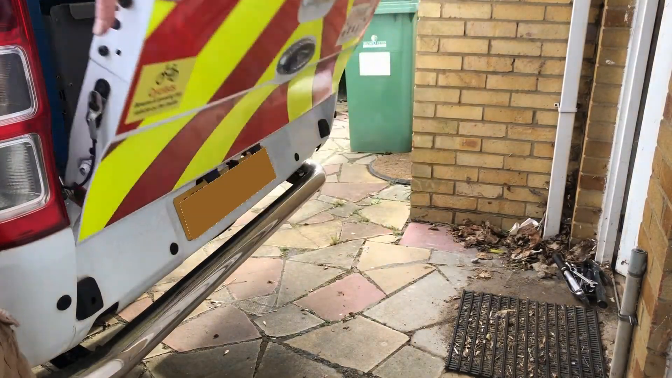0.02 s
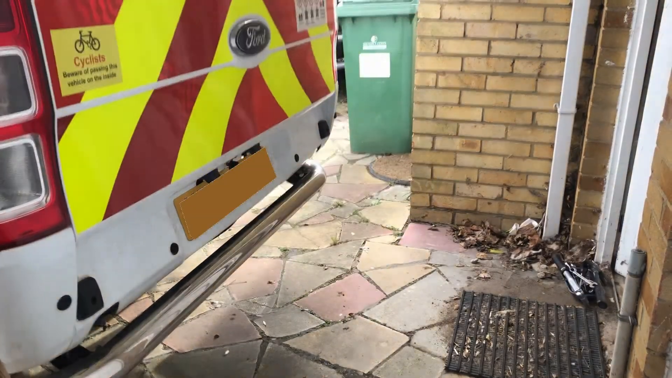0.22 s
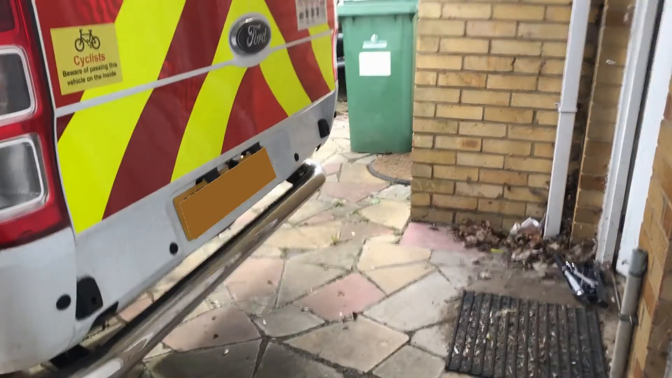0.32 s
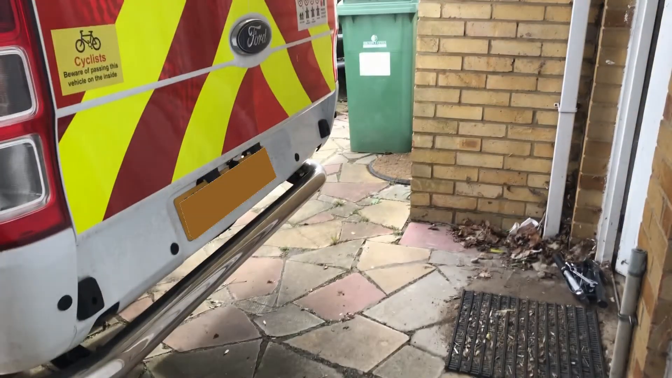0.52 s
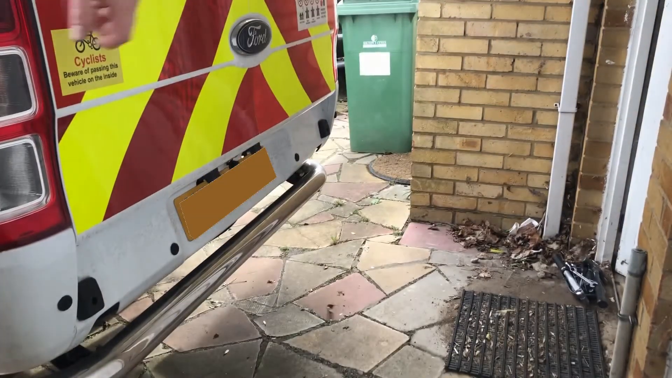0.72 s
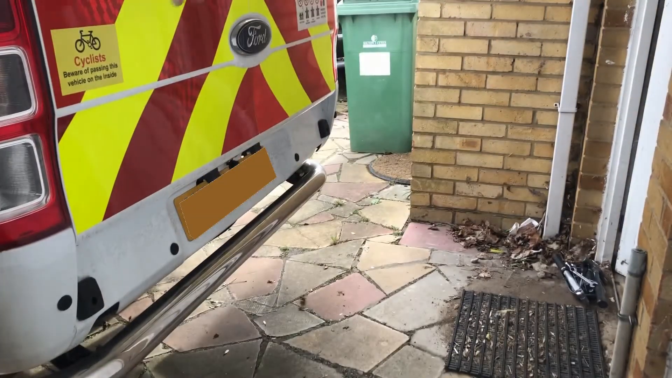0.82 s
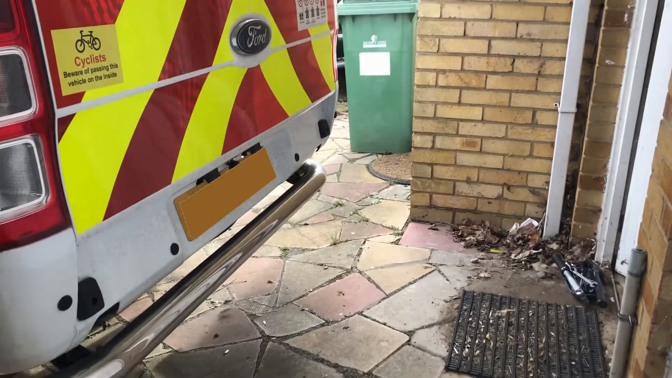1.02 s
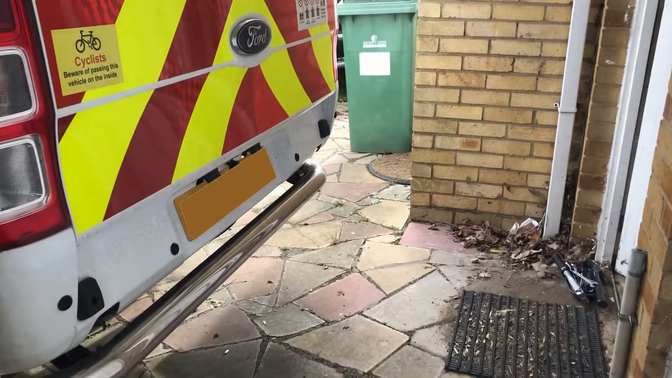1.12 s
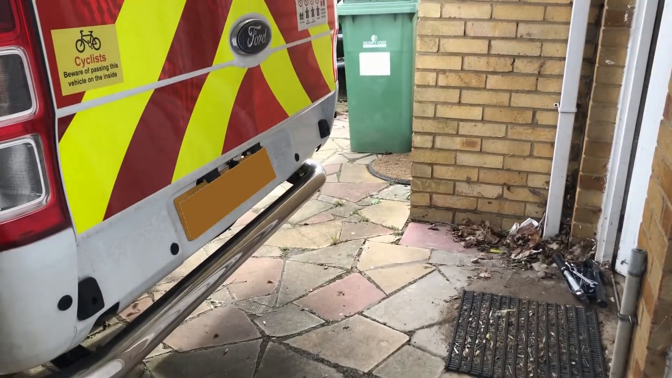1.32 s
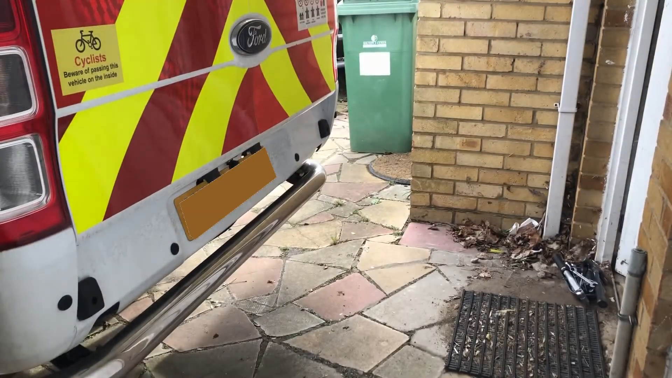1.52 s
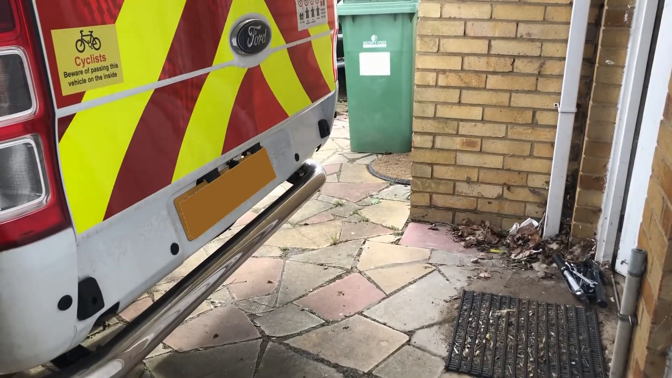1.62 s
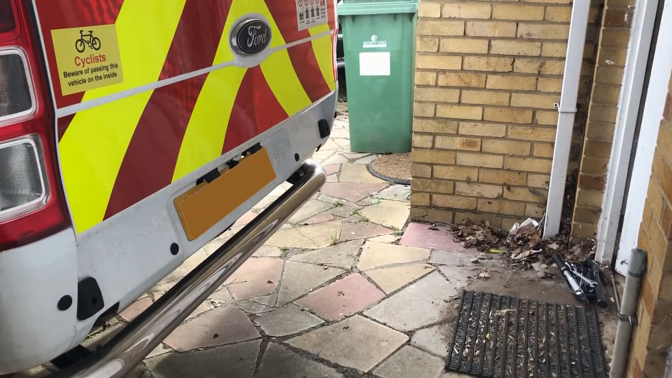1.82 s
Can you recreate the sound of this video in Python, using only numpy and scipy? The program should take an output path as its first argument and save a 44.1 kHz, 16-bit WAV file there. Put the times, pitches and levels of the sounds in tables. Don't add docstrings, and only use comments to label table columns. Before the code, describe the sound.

Van door slam: sharp metallic latch snap, deep hollow body thump, brief rattle, then faint scuffs

```python
import sys
import numpy as np
from scipy import signal
from scipy.io import wavfile

SR = 44100
rng = np.random.default_rng(int(sys.argv[2]) if len(sys.argv) > 2 else 0)


def master(y):
    cut = np.clip(np.atleast_2d(y).T, -1, 1)
    pcm = np.round(cut * 32767)
    wavfile.write(sys.argv[1], SR, pcm.astype(np.int16))


def invert_db(x):
    u = np.asarray(x, float) / 20
    return 10 ** u


N = 83790
T = np.arange(N) / SR


def rms_one(x):
    return x / np.sqrt(np.mean(x ** 2) + 1e-20)


def at_hz(points, hz):
    curve_hz, curve_db = np.array(points).T
    return np.interp(np.log(hz), np.log(curve_hz), curve_db)


def drift(rate):
    r = np.exp(-80 * np.pi * rate / SR)
    noise = rng.standard_normal(N // 40 + 2002)
    slow = signal.lfilter([1], [1, -2 * r, r * r], noise)[2000:]
    return np.interp(np.arange(N) / 40, np.arange(len(slow)), rms_one(slow))


def ring(clicks, hz, t60):
    r = invert_db(-60 / (t60 * SR))
    w = 2 * np.pi * hz / SR
    return signal.lfilter([0, np.sin(w)], [1, -2 * r * np.cos(w), r * r], clicks + 1e-18)


def swell(s, rise, t60):
    t = np.clip(T - s, 0, None)
    onset = np.sin(np.pi / 2 * np.minimum(t / max(rise, 1e-4), 1)) ** 2
    return onset * invert_db(-60 * np.maximum(t - rise, 0) / t60)


def bands(sources):
    edges = 20 * 2 ** np.arange(0, 10.1, .5)
    longer = np.concatenate([sources[:, -8000:], sources], axis=1)
    out = []
    for k, (low, high) in enumerate(zip(edges, edges[1:])):
        band = signal.butter(2, [low, high], "band", fs=SR, output="sos")
        out.append((np.sqrt(low * high), signal.sosfilt(band, longer[k % 2])[-N:]))
    return out


def grainy_bursts(rows, colour, rate, spread, lows_last):
    sizes = invert_db(spread * np.minimum(rng.exponential(1, (2, N)), 3)) * rng.choice([-1, 1], (2, N))
    grains = rms_one(sizes * (rng.random((2, N)) < rate / SR))
    out = 0
    for hz, x in bands(grains)[6:]:
        shape = 0
        for s, rise, db, t60, tilt in rows:
            level = invert_db(db + tilt * np.log2(hz / 4000))
            shape = shape + level * swell(s, rise, t60 * (4000 / hz) ** lows_last)
        out = out + invert_db(at_hz(colour, hz) + 9) * shape * x
    return out


def struck(hits, modes):
    chance = rng.normal(0, 2, (len(hits), len(modes)))
    out = []
    for k, (hz, level_db, t60) in enumerate(modes):
        pushes = np.zeros(N)
        for (s, db, contact_hz), odd in zip(hits, chance[:, k]):
            pushes[int(s * SR)] = -invert_db(db + level_db + odd) / (1 + (hz / contact_hz) ** 2)
        out.append(signal.lfilter([.2], [1, -.8], ring(pushes, hz, t60)))
    return out


def slipping(strokes, modes):
    slips_per_s = 6100
    stroke = sum(invert_db(db) * swell(s, rise, t60) for s, rise, db, t60 in strokes)
    sound = 0
    for hz, db, t60 in modes:
        sizes = invert_db(3 * np.minimum(rng.exponential(1, N), 3)) * rng.choice([-1, 1], N)
        slips = sizes * (rng.random(N) < slips_per_s / SR)
        sound = sound + invert_db(db) * rms_one(ring(slips, hz, t60))
    return stroke * rms_one(sound)


def panel():
    # t/s, level/dB, contact f/Hz
    thuds = [(.224, -60, 502), (.258, -30, 1163), (.275, -15, 800), (.2855, -0.5, 620), (.291, -15.5, 600),
             (.297, -4.5, 400), (.304, 4, 156), (.311, 3, 158.4), (.327, -14.5, 284), (.339, -4, 406),
             (.345, -4.5, 494), (.351, -11, 510), (.362, -9, 297), (.368, -2, 328), (0.398, -11, 390),
             (0.437, -37, 298)]
    # f/Hz, level/dB, t60/s
    panel_modes = [(102, -7.5, 0.12), (144.5, -3, 0.1), (177.4, 2.5, 0.095), (230, -12.5, 0.081),
                   (310, -25, 0.07), (344, -29, 0.03), (418.5, 2, 0.088), (569, 4, 0.12), (708, -16, 0.12),
                   (838, -9, 0.039), (940, -15.5, 0.054), (1291, -1.5, 0.1)]
    # f/Hz, level/dB, t60/s
    cabin_modes = [(48.1, -20.5, 0.85), (78, -21.5, 1), (107.6, -25, 0.75), (164.9, -17.5, 0.65),
                   (194.6, -19, 0.68), (247, -15, 1.0), (298, -14.5, 0.19), (348, -24, 0.68),
                   (418.2, -5, 0.28), (568, -28, 0.29)]
    seated_s, seated_db = .376, -5.5
    waver_db, waver_per_s = 4, 16
    grip = invert_db(-8.5 + seated_db * np.clip((T - seated_s) / 0.0026, 0, 1))
    cabin = 0
    for (hz, *_), x in zip(cabin_modes, struck(thuds, cabin_modes)):
        waver = waver_db * min(1, 90 / hz) * drift(waver_per_s)
        cabin = cabin + invert_db(-7.5 + waver) * x
    return grip * sum(struck(thuds, panel_modes)) + cabin


def boom():
    # t/s, level/dB
    squeezes = [
        (0.284, -6),
        (0.3044, -8.5),
        (0.325, -20),
        (.352, -15.5),
    ]
    air_hz, air_t60_s = 43.6, 0.17
    pushes = np.zeros(N)
    for s, db in squeezes:
        pushes[int(s * SR)] = -invert_db(db)
    lows = signal.butter(2, 90, fs=SR, output="sos")
    return signal.sosfilt(lows, ring(pushes, air_hz, air_t60_s))


def latch():
    # t/s, peak level/dB, colour [dB per octave], bolt share [0-1]
    snaps = [
        (.012, -52, -5, 0),
        (.1955, -8, -0.5, 0),
        (0.199, -13.5, -1.0, 0),
        (0.2393, 3, -0.5, 1),
        (0.2522, -1.5, 6, .8),
        (0.262, -13, 4, .7),
        (0.803, -40, 0, 0.4),
        (1.485, -60, 3, .6),
    ]
    # f/Hz, level from the pawl/dB, level from the bolt/dB, t60/s
    steel = [(2840, -4.5, -7.5, 0.0039), (3160, -9, -1.5, 0.01), (3670, -5.5, -13, 0.013),
             (4550, -3.5, -13, .008), (5620, -6.5, -9.5, 0.013), (6060, 2.5, -10, 0.012),
             (6340, -9.5, -5, .012), (9860, 3.5, -12, .008), (12000, -9, -7, .005),
             (13400, -15, 3.5, 0.0071), (14800, -8, -4, .005)]
    crunch_s, crunch_share = 0.00046, .4
    s, db, tilt, bolt = np.transpose(snaps)
    chance = rng.normal(0, 2, (len(s), len(steel)))
    r = np.exp(-1 / (crunch_s * SR))
    out = 0
    for k, (hz, pawl_db, bolt_db, t60) in enumerate(steel):
        clicks = np.zeros(N)
        level_db = pawl_db + np.clip(bolt, 0, 1) * (bolt_db - pawl_db)
        clicks[(s * SR).astype(int)] = invert_db(db + level_db - 12.5 + tilt * np.log2(hz / 6000) + chance[:, k])
        crunch = signal.lfilter([np.sqrt(1 - r * r)], [1, -r], clicks) * rng.standard_normal(N)
        out = out + ring(clicks * (-1) ** k + crunch_share * crunch, hz, t60)
    return out


def claw():
    # t/s, rise/s, level/dB, t60/s
    strokes = [
        (0.01, 0.0025, -46, 0.57),
        (0.054, 0.029, -37, 0.43),
        (.197, 0.0013, -25.5, 0.04),
        (.206, 0.0034, -30.5, 0.088),
        (1.21, 0.0094, -52.5, 0.23),
        (1.414, 0.01, -54.5, 0.2),
        (1.49, 0.022, -63, 0.25),
        (1.659, 0.025, -56, 0.14),
    ]
    # f/Hz, level/dB, t60/s
    claw_modes = [(2193, -3.5, 0.013), (3500, -3, 0.0031), (4000, -4, 0.0045), (4670, 1, 0.0097),
                  (5460, -1.5, 0.024), (6260, 1.5, 0.0082), (6530, -5, 0.0071), (9100, -9, 0.0048)]
    return slipping(strokes, claw_modes)


def rattles():
    # t/s, rise/s, level/dB, t60/s, colour [dB per octave]
    bursts = [
        (.12, 0.0046, -38, 2, -3.5),
        (.197, 0.00094, -27.5, 0.46, -2.5),
        (.2, 0.027, -41, 0.11, -3.5),
        (.239, 0.002, -10, 0.19, 2.5),
        (.25, 0.011, -9, 0.26, 3),
        (.272, 0.011, -10.5, 0.21, -4.5),
        (.325, 0.017, -21, 0.24, -2),
        (.41, 0.022, -36.5, 0.21, 1.5),
        (.45, 0.15, -70, 1.31, -3.5),
        (.9, 0.0034, -43, 0.15, -1),
    ]
    # f/Hz, level/dB
    colour = [(120, -13), (200, -12.5), (304, -8.5), (1200, -11.5), (3000, -14), (4300, -17.5), (6100, -16),
              (15500, -21.5)]
    return grainy_bursts(bursts, colour, rate=12000, spread=4, lows_last=0.2)


def spring():
    # f/Hz, level/dB
    coils = [(9400, -60), (12390, -56), (14500, -66)]
    shiver = sum(invert_db(db) * rms_one(ring(rng.standard_normal(N), hz, 0.05)) for hz, db in coils)
    return swell(.412, .016, .28) * shiver


def chatter():
    # t/s, rise/s, level/dB, t60/s
    strokes = [
        (.2395, 0.015, -19, 0.17),
        (.335, 0.0079, -26.5, 0.14),
        (1.48, 0.006, -58, 0.064),
    ]
    # f/Hz, level/dB, t60/s
    frame_modes = [(800, -4.5, 0.14), (1302, 2.5, 0.016), (1827, -13, 0.019), (2407, -3.5, 0.039),
                   (3130, -7, 0.015)]
    return slipping(strokes, frame_modes)


def taps():
    # t/s, level/dB
    touches = [(.2405, -25.5), (.2465, -21), (.2555, -21), (.2605, -14), (.2725, -14.5), (.2835, -15),
               (.9125, -40), (.9195, -41), (.9245, -44), (1.428, -60), (1.486, -62), (1.674, -60)]
    # f/Hz, level/dB, t60/s
    edge_modes = [(614, -7, 0.068), (826, -2.5, 0.044), (879, -2.5, 0.064), (1290, 0.5, 0.036),
                  (2430, -2.5, 0.033), (3150, -11, .02)]
    return sum(struck([(s, db, 2500) for s, db in touches], edge_modes))


def knock():
    # t/s, level/dB
    touches = [
        (0.198, -35),
        (0.214, -36),
        (0.9022, -33),
        (0.9054, -39.5),
        (0.9078, -35),
        (.915, -49),
        (0.2283, -26),
    ]
    # f/Hz, level/dB, t60/s
    shell_modes = [(357, -17.5, 0.067), (439, 0, 0.036), (514, -9.5, 0.037), (885, -8, 0.05),
                   (1053, -6, .05), (1386, -8, 0.1), (2400, -11, 0.025)]
    return sum(struck([(s, db, 900) for s, db in touches], shell_modes))


def settling():
    # t/s, level/dB, f/Hz, t60/s
    parts = [(.013, -44, 2300, .03), (.083, -42, 2250, .03), (.2405, -17, 1290, .08), (.47, -30, 172, .2),
             (.615, -42, 247, .5), (.738, -38, 105, .15), (.79, -41, 41, .4), (.804, -54, 5200, .04),
             (.9015, -42, 870, .06), (.9188, -41, 2380, .025), (.921, -43, 1330, .04),
             (.921, -38, 110, .08), (1.29, -43, 173, .3), (1.418, -50, 6900, .02), (1.426, -53, 2300, .04),
             (1.43, -52, 5500, .04), (1.483, -50, 3270, .04), (1.484, -52, 2400, .04),
             (1.49, -52, 11800, .03), (1.515, -57, 3750, .12), (1.672, -52, 5000, .04),
             (1.674, -54, 1950, .03), (1.678, -52, 8000, .02), (1.84, -55, 2350, .06)]
    out = 0
    for s, db, hz, t60 in parts:
        out = out - invert_db(db) * swell(s, 1.5 / hz, t60) * np.sin(2 * np.pi * hz * (T - s))
    return out


def scuffs():
    # t/s, rise/s, level/dB, t60/s, colour [dB per octave]
    bursts = [(-.01, 0.0045, -47.5, .4, -3), (.011, 0.002, -44.5, 0.15, 3), (.054, 0.0073, -37, 0.5, 2),
              (.56, 0.016, -55.5, 1.4, -2.5), (.65, 0.011, -60.5, 0.24, -2), (.71, 0.031, -67.5, 0.3, -7.5),
              (.802, 0.0045, -62, 0.4, 4.5), (.83, 0.016, -78, 0.2, 3), (.9, 0.01, -45.5, 0.26, -8.5),
              (.912, 0.017, -50, 0.21, 4), (1.0, 0.027, -62.5, 1.5, 2.5), (1.1, 0.015, -51, 0.52, -7),
              (1.18, 0.03, -51.5, 0.23, -0.5), (1.21, 0.031, -51.5, 0.16, -1.5),
              (1.412, 0.0092, -55, 0.27, 5.5), (1.476, 0.014, -47.5, 0.23, 0), (1.52, 0.024, -71, 0.35, 5),
              (1.645, 0.029, -49.5, 0.28, -0.5), (1.77, 0.024, -67, .4, 3.5)]
    # f/Hz, level/dB
    colour = [(200, -27), (600, -17), (1400, -10.5), (2400, -6.5), (5800, -5), (9000, -6.5), (15500, -12.5)]
    return grainy_bursts(bursts, colour, rate=11000, spread=4.7, lows_last=0.084)


def yard(x):
    t60_s, level_db, wall_cut_hz = 0.25, -17.5, 5100
    dull = np.exp(-2 * np.pi * wall_cut_hz / SR)
    lags = (rng.uniform(.008, .03, size=8) * SR).astype(int)
    out = 0
    for k, lag in enumerate(lags):
        loop = x.copy()
        gain = invert_db(-60 * lag / SR / t60_s)
        state = [0.]
        for i in range(lag, N, lag):
            back, state = signal.lfilter([gain * (1 - dull)], [1, -dull], loop[i - lag:i], zi=state)
            loop[i:i + lag] += back[:N - i]
        out = out + (loop - x) * (-1) ** k
    return invert_db(level_db) * out


def town(patchy_db):
    # f/Hz, level/dB
    colour = [(20, -10), (40, -10.5), (70, -3.5), (120, -3.5), (200, -7), (730, -20), (1800, -29),
              (15500, -50.5)]
    together = drift(1.0)
    out = 0
    for hz, x in bands(rng.standard_normal((2, N))):
        waver = patchy_db * (0.28 * together + drift(9.6))
        out = out + invert_db(at_hz(colour, hz) + waver) * x
    return invert_db(-47) * rms_one(out)


def scene():
    metal = latch() + claw() + spring() + rattles()
    door = metal + panel() + boom() + chatter() + taps() + knock() + settling()
    return (door + yard(metal) + scuffs() + town(patchy_db=1.5))[None]


def band_limit(x):
    return signal.sosfilt(signal.butter(12, 16970, fs=SR, output="sos"), x)


def record(dry):
    low_cut_hz, high_cut_hz, top = 22, 15750, 0.9
    low_cut = signal.butter(2, low_cut_hz, "high", fs=SR, output="sos")
    high_cut = signal.ellip(10, .5, 70, high_cut_hz, fs=SR, output="sos")
    x = signal.sosfilt(low_cut, dry)
    x = top * np.tanh(x / top)
    x = signal.sosfilt(high_cut, x)
    return band_limit(x)


dry = scene()
out = record(dry)
master(out)
```